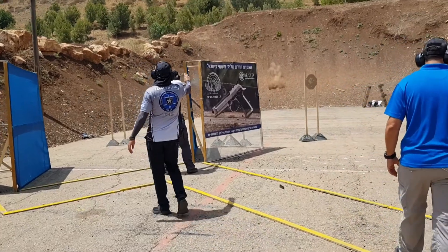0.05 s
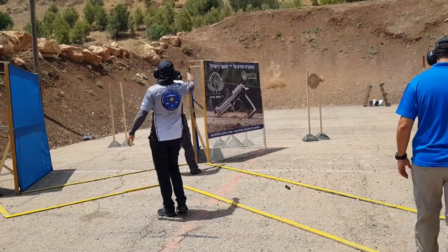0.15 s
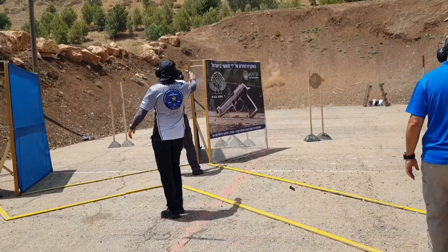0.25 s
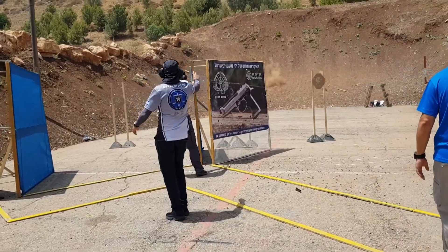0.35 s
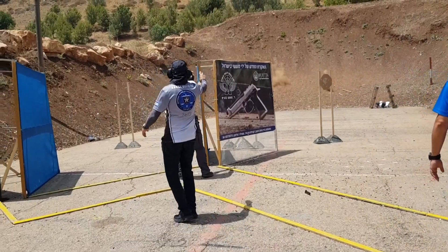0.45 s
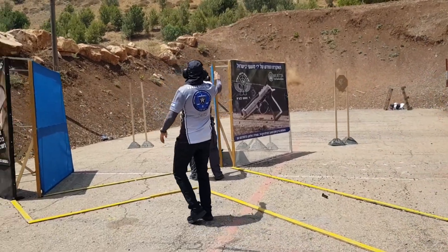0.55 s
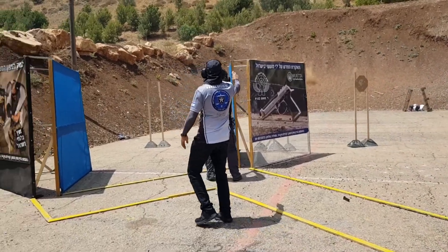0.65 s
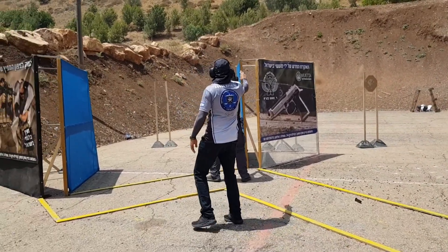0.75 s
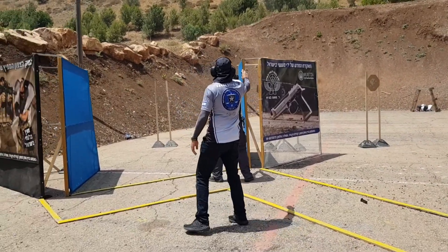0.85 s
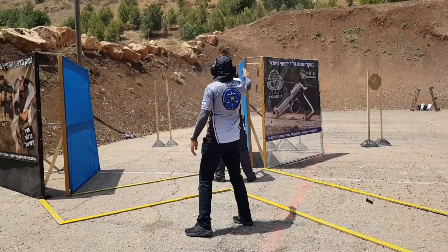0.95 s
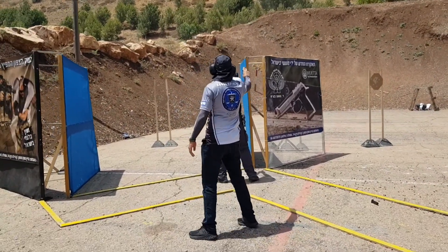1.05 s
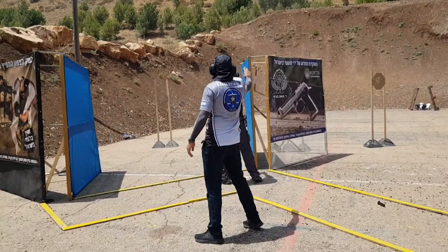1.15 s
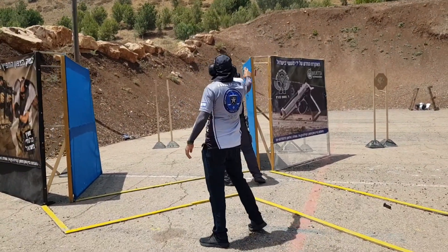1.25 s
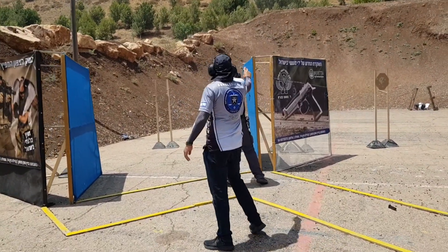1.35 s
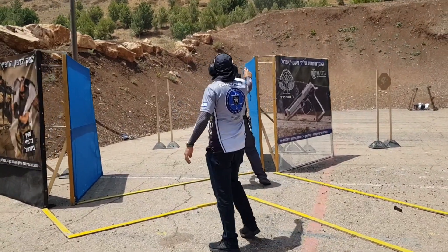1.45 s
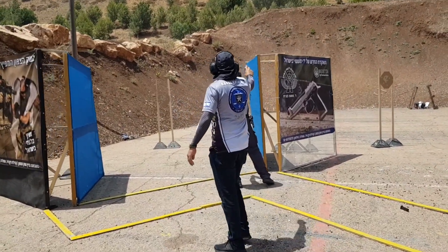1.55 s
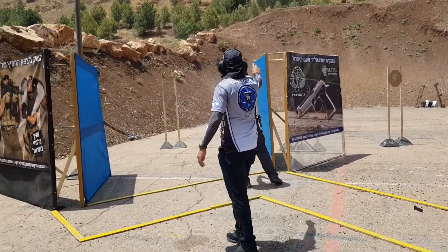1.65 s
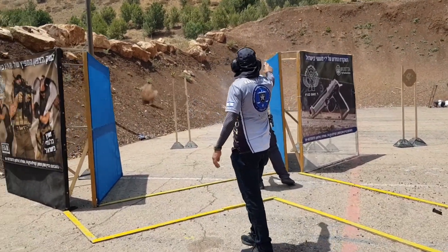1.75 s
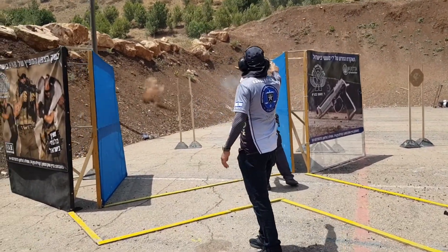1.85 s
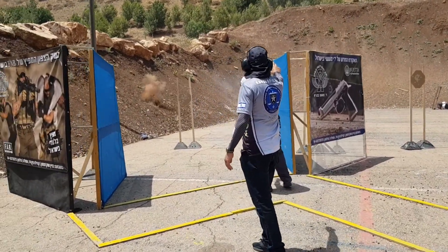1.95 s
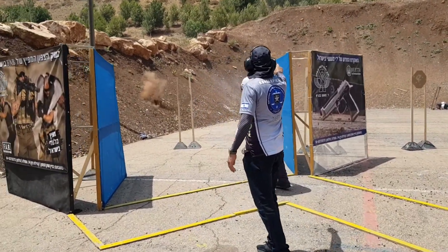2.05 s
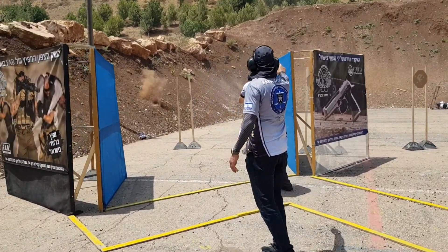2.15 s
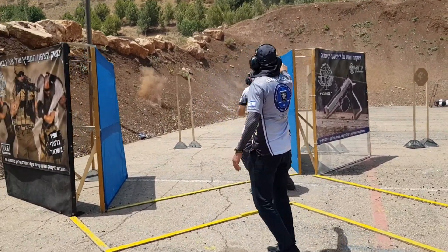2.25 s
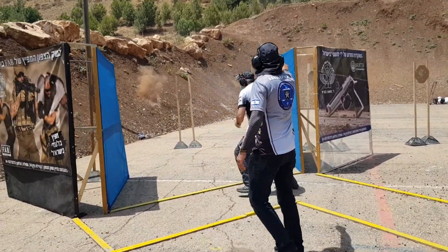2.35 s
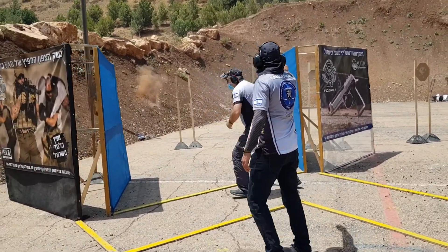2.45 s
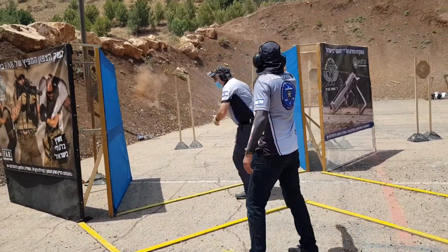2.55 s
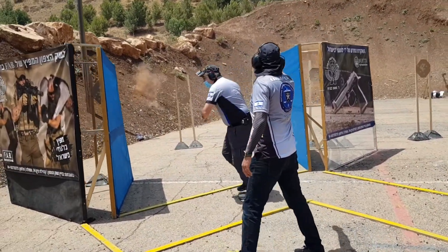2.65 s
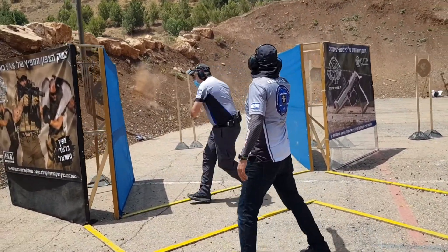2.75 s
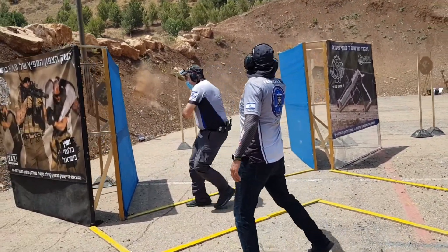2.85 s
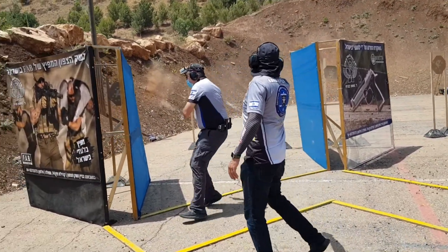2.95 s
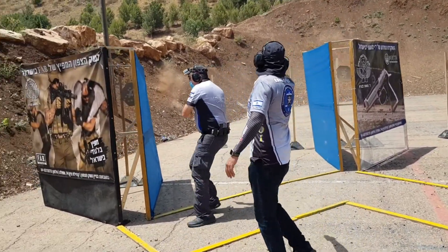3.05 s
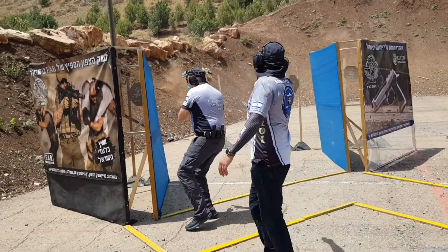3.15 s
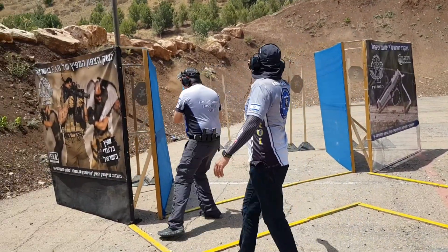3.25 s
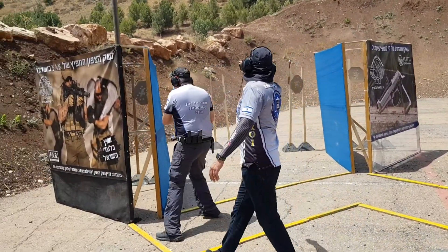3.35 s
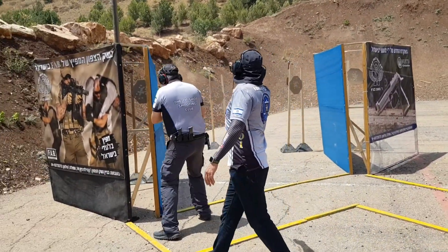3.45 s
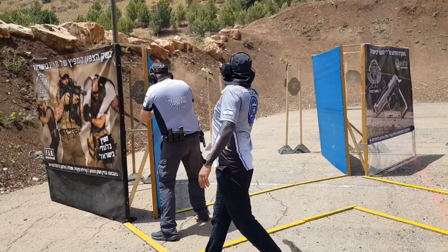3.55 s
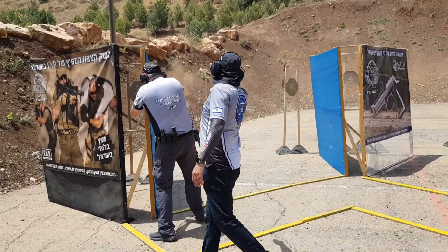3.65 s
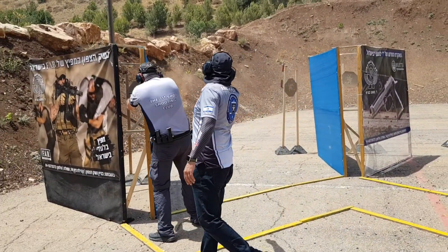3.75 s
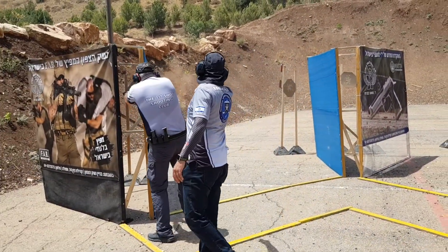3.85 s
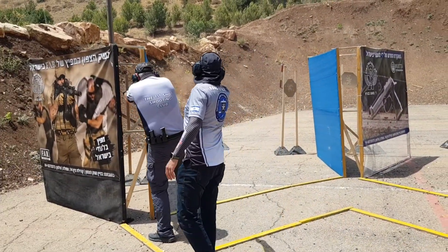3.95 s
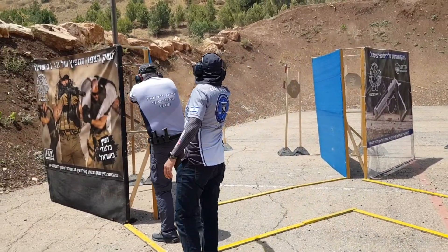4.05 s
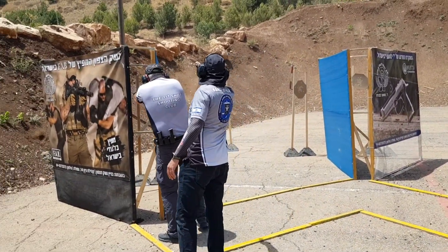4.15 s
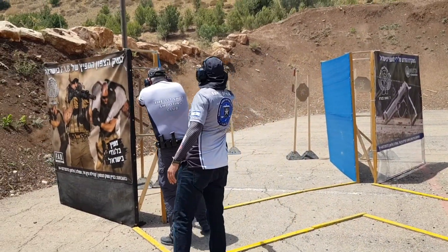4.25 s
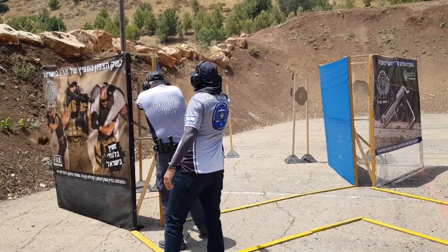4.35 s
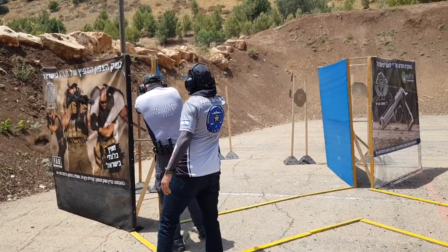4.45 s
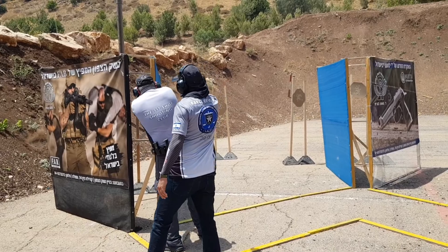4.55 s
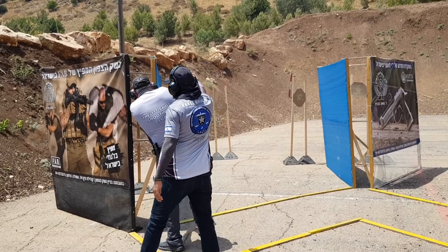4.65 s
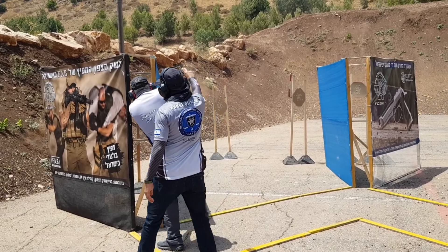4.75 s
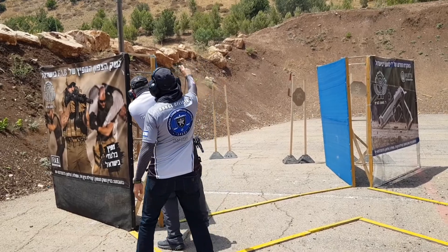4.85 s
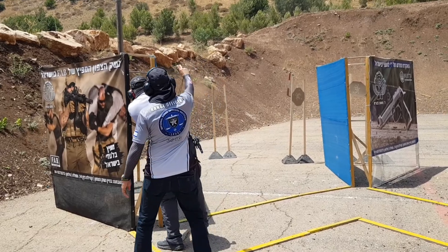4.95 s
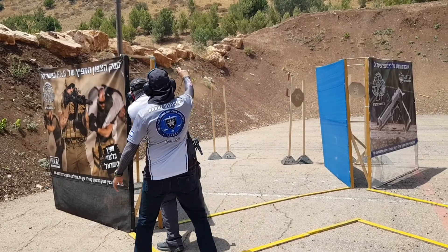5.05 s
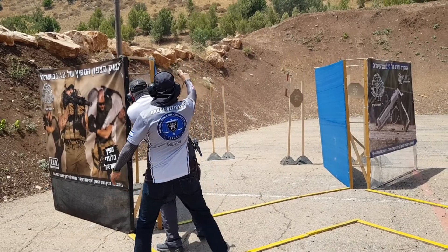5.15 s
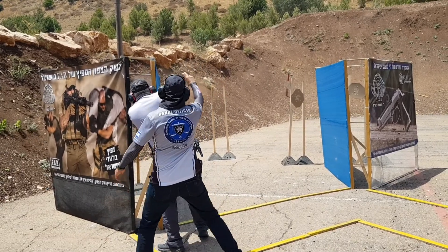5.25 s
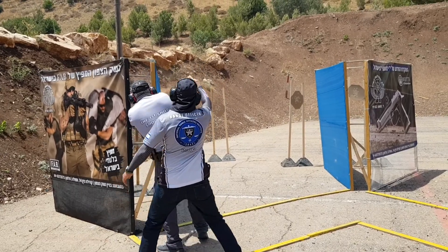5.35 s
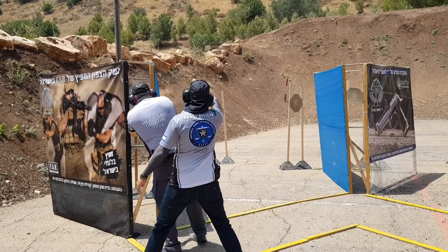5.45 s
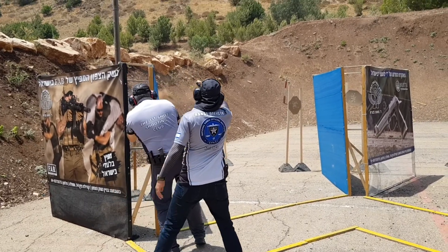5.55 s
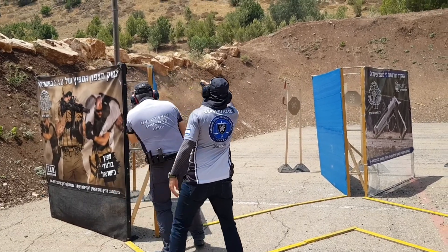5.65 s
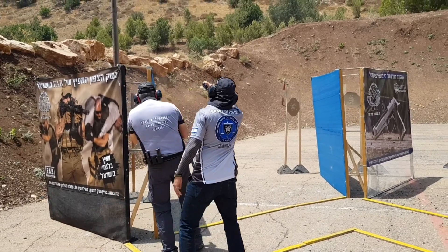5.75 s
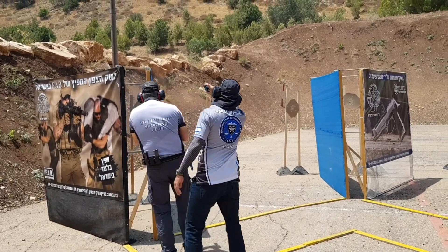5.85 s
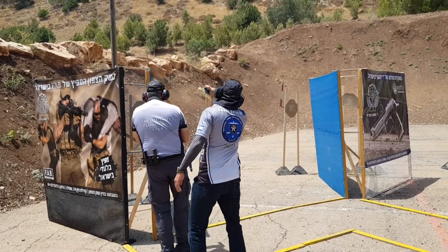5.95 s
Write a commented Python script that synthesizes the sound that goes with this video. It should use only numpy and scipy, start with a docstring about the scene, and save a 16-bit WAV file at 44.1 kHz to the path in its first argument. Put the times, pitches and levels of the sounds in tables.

```python
"""Pistol pairs on a walled range

A pistol fires quick pairs on a paved outdoor range walled by earth banks, a few metres from a phone.
Blasts are pressure pulses, direct and off panels; shaped noise is the wash; pulse clusters are bank slaps.
Brass cases tinkle as decaying sines and noise; shoes scuff, air hushes and a drone sinks as filtered noise.
The left port is muffled, the right one open; each channel is limited."""
import sys
import numpy as np
from scipy import signal
from scipy.fft import rfft, irfft
from scipy.io import wavfile
from scipy.ndimage import uniform_filter1d, minimum_filter1d

SR = 44100
rng = np.random.default_rng(int(sys.argv[2]) if len(sys.argv) > 2 else 0)


def wrap_up_sound(samples):
    """Save the sound to the file named by the first command line argument, as 16-bit audio."""
    columns = np.atleast_2d(samples).T
    # keep every value between -1 and 1, then stretch to whole-number steps
    tamed = np.clip(columns, -1, 1)
    steps = np.round(tamed * 32767).astype(np.int16)
    wavfile.write(sys.argv[1], SR, steps)


def invert_db(x):
    """Field ratio 10**(x/20) for x, a level in decibels (scalar or array-like)."""
    u = np.asarray(x, float) / 20
    return 10 ** u


N = 264600


def on_log(points, hz):
    """A (Hz, dB) table read on a log-frequency axis."""
    f, db = np.transpose(points)
    return np.interp(np.log(np.maximum(hz, 1)), np.log(f), db)


def colour(x, *tables, size=2048):
    """Causal filter, by folded cepstrum, whose gain is the sum of the (Hz, dB) tables."""
    hz = np.arange(size // 2 + 1) * SR / size
    gain = invert_db(sum(on_log(table, hz) for table in tables))
    cepstrum = irfft(np.log(gain))
    cepstrum[1:size // 2] *= 2
    cepstrum[size // 2 + 1:] = 0
    response = irfft(np.exp(rfft(cepstrum)))
    return signal.fftconvolve(x, response)[:len(x)]


def unit(x):
    """Scale to rms 1."""
    return x / np.sqrt(np.mean(x ** 2))


def band(x, hz, kind, order=2):
    """Butterworth filter."""
    return signal.sosfilt(signal.butter(order, hz, kind, fs=SR, output="sos"), x)


def walk(rate, size=N):
    """Random levels held 1 / rate s and slewed; spread near 1."""
    hold = int(SR / rate)
    levels = np.repeat(rng.standard_normal(size // hold + 1), hold)
    return uniform_filter1d(levels, hold)[:size]


def add(track, s, sound):
    """Mix a sound in at time s; what falls outside is lost."""
    i = int(round(s * SR))
    a, b = max(i, 0), max(min(i + sound.shape[-1], N), 0)
    if b > a:
        track[..., a:b] += sound[..., a - i:b - i]


def decay(t, t60):
    """Exponential fade, 60 dB in t60."""
    return np.exp(-np.log(1000) * t / t60)


# Shots. Each row: start in seconds, then relative levels in dB: blast, wash and slaps, wash bass, crack.
SHOT_ROWS = [(-.134, -13, 0, 4, -6), (0.1413, -6.5, 0, -2.5, -25), (0.337, -6.5, 1, -1, -22),
             (1.027, -7.5, -2.5, 6.5, -50), (1.246, -4.5, -3, 5, -19.5), (1.729, -5.5, -1.5, 6.5, -40),
             (1.9444, 1, -2.5, 5, -35.5), (4.1461, -16, -4.5, 4, -3), (4.3637, -6.5, -5, 3, -23.5),
             (4.8377, -8.5, -5, 3, -28.5), (5.0607, -8.5, -5, 3, -24)]
# Port responses. Each row: frequency in Hz, gain in dB.
OPEN_PORT = [(60, -28), (165, -27), (280, -12.5), (570, -2), (1000, -7), (2000, -8), (3200, -11),
             (4300, -8), (6900, -7), (8100, -24.5), (9500, -18.5), (12000, -12.5), (15000, -21)]
MUFFLED_PORT = [(60, -43.5), (300, -29.5), (1400, -31), (2500, -36.5), (4000, -53.5), (6800, -82.5),
                (15000, -75.5)]
MOVES_S = 3.0  # earlier shots are from the first stance, later ones from the second


def pistol():
    """All shots through the two port responses; cracks and thumps enter the open port directly."""
    air, close = np.zeros((2, N)), np.zeros(N)
    for s, blast_db, wash_db, bass_db, crack_db in SHOT_ROWS:
        stance = int(s > MOVES_S)
        add(air, s, wash(stance, wash_db, bass_db))
        add(close, s, invert_db(crack_db) * crack())
        add_blast(air, s, blast_db, stance)
        add_slaps(air, s, wash_db, stance)
    add_knocks(air)
    add_thumps(close)
    return np.array([colour(air[0], MUFFLED_PORT), colour(air[1], OPEN_PORT) + close])


# Scattering ground, one list per stance: near yard, foot and crest of the far bank, hills.
# Each row: start in ms after the shot, build in ms, relative peak in dB, fall in dB/s, treble in dB.
FIELD_ROWS = [
    [(0, 20.9, -1, 218, 1.5), (202.9, 4, -29, 112, 0.5), (215, 11, -30, 160, 1),
     (250, 37, -52.5, 28.5, -10)],
    [(0, 24.7, -1.5, 216, 1.5), (201, 8.5, -32, 99, 4), (227, 7.3, -32.5, 171, -1), (248, 50, -69, 11, -3)],
]
# How far under its peak a field starts, in dB, one entry per stance.
FIELD_BUILD_DB = [9, 10.5]
# The wash dips briefly before the side wall answers; one depth per stance.
LULL_DB, LULL_AT_MS, LULL_MS = [-3, -2], 70.8, 5
DULL_START_DB, DULL_START_MS = -3.5, 26.3


def fields(t, stance):
    """Level and treble of the wash: each field builds, then falls steadily in dB; their powers add."""
    start_ms, build_ms, db, fall, treble_db = np.transpose(FIELD_ROWS[stance])[:, :, None]
    ms = t * 1000 - start_ms
    db = db - FIELD_BUILD_DB[stance] * np.clip(1 - ms / build_ms, 0, 1)
    db = db - fall * np.maximum(ms - build_ms, 0) / 1000
    power = (ms >= 0) * invert_db(2 * db)
    total = power.sum(axis=0) + 1e-18
    lull_db = LULL_DB[stance] * np.exp(-((t * 1000 - LULL_AT_MS) / LULL_MS) ** 2)
    dull_db = DULL_START_DB * np.exp(-t * 1000 / DULL_START_MS)
    return 10 * np.log10(total) + lull_db, (power * treble_db).sum(axis=0) / total + dull_db


KNOCK_CYCLES, KNOCK_EDGE_DB = 1.2, -3  # cycles to fall to 1/e


def knock(hz):
    """A cycle or two of a dull tone with a rough bright edge."""
    t = np.arange(SR // 50) / SR
    edge = invert_db(KNOCK_EDGE_DB) * rng.standard_normal(len(t)) * decay(t, .005)
    return np.sin(2 * np.pi * hz * t) * np.exp(-t * hz / KNOCK_CYCLES) + edge


FACETS_PER_S, FACET_DB, FACETS_S = 110, 8, .08  # rate at each pitch


def facets(t):
    """Flat faces in the near yard knock at random times at each of three pitches, thinning in level."""
    out = 0
    for hz in np.geomspace(900, 2800, num=3):
        place, size = rng.random((2, len(t)))
        hits = (place < FACETS_PER_S / SR) * (2 * size - 1) * np.exp(-(t / FACETS_S) ** 2)
        out = out + invert_db(FACET_DB) * signal.fftconvolve(hits, knock(hz))[:len(t)]
    return out


AIM_DB = 2.8


def aim_bumps():
    """Random tone bumps, as every aim lights other surfaces."""
    hz = np.geomspace(700, 7000, num=20)
    db = AIM_DB * rng.standard_normal(len(hz)) * np.hanning(len(hz)) ** .25
    return np.transpose([hz, db])


# Time in ms for the open port's wash to swell to full gain: bass, middle, treble.
OPEN_SWELL_MS = [8.1, 11.9, 9.7]
LIKENESS_HZ, TILT_HZ = 744, 2600  # band edges; ports are alike below the first
GRAIN_DB, MIDDLE_DB = 3.2, 3


def wash(stance, wash_db, bass_db):
    """Thousands of small uneven echoes, alike at both ports in the bass, clumped differently by range."""
    t = np.arange(int(.8 * SR)) / SR
    level_db, treble_db = fields(t, stance)
    grain = np.minimum(rng.exponential(size=(3, len(t))), 5) - 1.5
    shared, left, right = rng.standard_normal((3, len(t))) * invert_db(GRAIN_DB * grain)
    faces = facets(t)
    shared, right = shared + faces, right + faces
    bass = band(shared, LIKENESS_HZ, "low")
    rest = band(np.array([left, right]), LIKENESS_HZ, "high")
    middle = band(rest, TILT_HZ, "low", order=3)
    treble = band(rest, TILT_HZ, "high", order=3)
    # each part: signal, level dB, clump spread dB
    parts = ((bass, bass_db, 2.6), (middle, MIDDLE_DB, 3), (treble, treble_db, 1.8))
    # the muffled port's wash is strongest at once and fades;
    # the open port's is held down at first and swells in over some ten ms
    muffled_gate = 0.7 + 3 * np.exp(-t / 0.021)
    pair = 0
    for swell_ms, (part, db, clump_db) in zip(OPEN_SWELL_MS, parts):
        gate = np.array([muffled_gate, np.clip(2 * t * 1000 / swell_ms - 1, .2, 1)])
        pair = pair + part * gate * invert_db(db + clump_db * walk(90, size=len(t)))
    flutter_db = 1.39 * walk(260, size=len(t))
    pair = pair * invert_db(wash_db + level_db + flutter_db) * (1 - (t / t[-1]) ** 4)
    # the bumps in tone shift as farther surfaces answer
    early, late = aim_bumps(), aim_bumps()
    near = np.exp(-(2 * t / FACETS_S) ** 2)
    return 2.68 * np.array([colour(port * near, early, size=512)
                            + colour(port * (1 - near), late, size=512) for port in pair])


CRACK_HZ, CRACK_MS, OPEN_LAG_MS = [3300, 5100], 4.4, 7.2


def crack():
    """A short hard noise crack, which returns off the panels with the wash and dies away."""
    ms = np.arange(8000) * 1000 / SR
    returned = (ms > OPEN_LAG_MS) * np.exp(-ms / 18.0)
    hiss = rng.standard_normal(len(ms)) * (np.exp(-(ms / CRACK_MS) ** 4) + returned)
    return 4 * band(hiss, CRACK_HZ, "band", order=4) + 2.5 * band(hiss, 11000, "high", order=6)


# Open-air hush. Each row: time in seconds, relative level in dB, tilt in dB per three octaves about 600 Hz.
AIR_ROWS = [(0.98, -57.5, 3.5), (2.5, -59.5, 6.5), (3.636, -65.5, 2.5), (4.098, -66, -1), (5.6, -61, 6.5)]
# Hush tone. Each row: frequency in Hz, gain in dB.
HUSH_TONE = [(150, -13), (212, -20.5), (300, -2.5), (600, 1), (1100, -3), (1380, -11), (1800, -6.5),
             (2300, -12.5), (3600, -16.5), (6700, -18.5), (8250, -46.5), (10600, -29.5), (15000, -39)]
# Extra tone of the left port. Each row: frequency in Hz, left minus right in dB.
HUSH_LEFT = [(150, -1.5), (300, -21), (1500, -28), (5000, -43.5), (8000, -31), (15000, -17.5)]
# Wind rumble. Each row: time in seconds, relative level in dB.
RUMBLE_ROWS = [(0, -80.5), (3.6, -85), (4.1, -82.5)]


def outdoors():
    """Patchy open-air hush, noise bands swelling apart, and a low wind rumble common to both ports."""
    s, db, tilt_db = np.transpose(AIR_ROWS)
    clock = np.arange(N) / SR
    hush = np.zeros((2, N))
    for hz in 150 * 2 ** np.arange(0, 6.6, .25):
        swell_db = (5.2 * walk(9.8) + 3.3 * walk(1.4)) * min(1, 1500 / hz)
        swell_db = swell_db + np.interp(clock, s, tilt_db) * np.log2(hz / 600) / 3
        noise = rng.standard_normal((2, N))
        hush += band(noise, [hz / 1.07, hz * 1.074], "band", order=1) * invert_db(swell_db)
    left = colour(hush[0], HUSH_TONE, HUSH_LEFT)
    right = colour(hush[1], HUSH_TONE)
    scale = 2 / np.std(band(right, [300, 1500], "band"))
    pair = scale * np.array([left, right]) * invert_db(np.interp(clock, s, db))
    rumble = unit(band(rng.standard_normal(N), [55, 110], "band", order=3))
    rumble = rumble * invert_db(np.interp(clock, *np.transpose(RUMBLE_ROWS)))
    return pair + rumble * invert_db(np.array([[-3], [2.5]]))


# Knocks off panels and far-bank faces. Each row: start in seconds, relative level in dB, pitch in Hz.
KNOCK_ROWS = [(0.0715, -11, 650), (0.1045, -10, 520), (0.5375, -10, 700), (0.5715, -12, 480),
              (1.2295, -12, 700), (1.4485, -13, 800), (1.9325, -9, 750), (2.1483, -11, 750),
              (2.1698, -10, 2200), (2.1773, -8, 2500), (1.9593, 9, 750), (1.9755, 8, 1100),
              (4.3737, 8, 1200)]


def add_knocks(air):
    """Single knocks off panels and faces of the far bank, at both ports."""
    for s, db, hz in KNOCK_ROWS:
        add(air, s, invert_db(db) * knock(hz))


def friedlander(ms):
    """Sudden overpressure lasting ms, then suction."""
    x = np.arange(300) * 1000 / SR / ms
    return (1 - x) * np.exp(-x)


# Direct sound, ground and panels, one list per stance. Each row: delay in ms after the shot, level in dB.
ARRIVAL_ROWS = [
    [(0, 3.5), (1.8, 9.5), (3.4, 5.5), (23, -5.5)],
    [(0, 5.5), (2.6, 5.5), (10, 3.5), (21, 0)],
]
BLAST_MS, MUFFLED_BLAST_DB, OPEN_BLAST_DB = 0.49, 28, -10  # gains ahead of the port responses


def add_blast(air, s, db, stance):
    """Sharp arrivals of the muzzle pulse, low-passed at the open port."""
    pulse = friedlander(BLAST_MS)
    soft_pulse = band(pulse, 1300, "low")
    for ms, echo_db in ARRIVAL_ROWS[stance]:
        add(air[0], s + ms / 1000, invert_db(db + echo_db + MUFFLED_BLAST_DB) * pulse)
        add(air[1], s + ms / 1000, invert_db(db + echo_db + OPEN_BLAST_DB) * soft_pulse)


# Buffets of the open port. Each row: start in seconds, relative level in dB.
THUMP_ROWS = [(0.161, -23.5), (0.348, -23), (1.033, -24.5), (1.98, -17), (4.147, -6.5), (4.3717, -13),
              (5.068, -21)]
THUMP_HZ, THUMP_FADE_S = 58.7, 0.035 / 9  # the swell peaks after two of these


def add_thumps(close):
    """Low tone swells in the open port as blasts buffet it."""
    t = np.arange(8000) / SR
    swing = t / THUMP_FADE_S
    thump = swing ** 2 * np.exp(-swing) * 2 * np.sin(2 * np.pi * THUMP_HZ * t)
    for s, db in THUMP_ROWS:
        add(close, s, invert_db(db) * thump)


# Slaps from wall and banks, one list per stance. Each row: delay in ms after the shot, relative level in dB.
SLAP_ROWS = [
    [(102.5, -1)],
    [(92, 0.5), (202.6, 0)],
]
# Overpressure time of a slap pulse in ms, one entry per stance.
SLAP_PULSE_MS = [0.36, 0.034]


def add_slaps(air, s, db, stance):
    """A rough surface returns a fading cluster of nine pulses of random size and sign."""
    pulse = friedlander(SLAP_PULSE_MS[stance])
    for ms, echo_db in SLAP_ROWS[stance]:
        for late, size in rng.random((9, 2)):
            gain = invert_db(db + echo_db) * (4 * size - 2) * (1 - late)
            add(air, s + (ms + 2.1 * late) / 1000, gain * pulse)


# Bouncing brass. Each row: start in seconds, relative tick level in dB, ring in Hz, relative ring level in dB.
CASE_ROWS = [(0.943, -43, 10200, -46.5), (1.557, -62, 10150, -55), (2.467, -45, 10300, -52.5),
             (2.6, -42, 10400, -50.5), (2.834, -42.5, 10300, -42.5), (2.877, -41, 10440, -66),
             (3.138, -39.5, 10300, -57.5), (3.316, -42, 11100, -59.5), (3.385, -40, 10470, -59.5),
             (3.5155, -45, 11000, -57), (3.5473, -63, 11150, -49.5), (3.5574, -53, 5180, -59.5),
             (3.6514, -47, 10480, -46), (3.7848, -39.5, 10220, -65.5), (3.8487, -39, 10380, -67),
             (4.0019, -50, 10450, -54), (5.457, -40.5, 9900, -55), (5.6024, -50.5, 10000, -62),
             (5.803, -68, 10450, -62), (5.898, -62, 10240, -62), (5.98, -37, 10400, -48.5)]
TICK_HZ, TICK_T60_S = 5310, 0.01  # each tick is detuned up to 2.5 %
STRIKE_T60_S, SUSTAIN_DB = 0.018, -17.5
RING_T60_S = 1.1  # before the half-second linear fade
SPIN_HZ = 44.5  # scaled at random by 0.5 to 1.5


def cases():
    """Each bounce ticks and rebounds faintly; the brass tube rings on and wavers as it spins."""
    out, t = np.zeros(N), np.arange(SR // 2) / SR
    touch = 1 - np.exp(-t / 0.00014)
    for (s, db, hz, ring_db), (a, b) in zip(CASE_ROWS, rng.random((len(CASE_ROWS), 2))):
        tone = np.sin(2 * np.pi * TICK_HZ * (1 + (a - .5) / 20) * t)
        rattle = band(rng.standard_normal(len(t)), [4300, 6800], "band", order=4)
        tick = invert_db(db) * decay(t, TICK_T60_S) * (np.sqrt(b) * tone + rattle)
        click = band(rng.standard_normal(len(t)), [9800, 14000], "band", order=4)
        click = .25 * decay(t, .018) * click
        spin = invert_db(6.5 * walk(SPIN_HZ * (.5 + b), size=len(t))) * (1 - 2 * t)
        fade = decay(t, STRIKE_T60_S) + invert_db(SUSTAIN_DB) * decay(t, RING_T60_S) * spin
        ring_hz = hz + 40 * walk(150, size=len(t))
        ring = fade * np.sin(2 * np.pi * np.cumsum(ring_hz) / SR)
        add(out, s, 2 * touch * (tick + invert_db(ring_db) * (click + ring)))
        add(out, s + (1 + b / 4) / 110, invert_db(-14) * 2 * touch * tick)  # rebound
    return np.array([[invert_db(-37.5)], [1]]) * out


# Standing-out band of the hush. Each row: time in seconds, centre in Hz, relative level in dB.
DRONE_ROWS = [(2.6, 758.4, -71), (3.03, 680, -64), (3.36, 590, -69.5), (3.5, 570, -82.5), (3.61, 550, -61),
              (3.72, 540, -73)]
DRONE_WIDTH_HZ = 54  # low-pass edge either side of the centre


def drone():
    """A narrow band of noise around a sinking centre, at the open port."""
    s, hz, db = np.transpose(DRONE_ROWS)
    clock = np.arange(N) / SR
    turn = 2 * np.pi * np.cumsum(np.interp(clock, s, hz)) / SR
    a, b = band(rng.standard_normal((2, N)), DRONE_WIDTH_HZ, "low")
    tone = unit(a * np.cos(turn) + b * np.sin(turn))
    return np.array([[0], [2]]) * tone * invert_db(np.interp(clock, s, db, left=-np.inf))


# Scuffs. Each row: centre in seconds, relative level in dB, time from centre to 1/e in seconds.
STEP_ROWS = [(3.179, -64.5, 0.058), (3.367, -64, 0.054), (3.835, -59.5, 0.033)]


def steps():
    """Soft swells of grit under rubber soles, dull noise with a thinner upper band."""
    out, t = np.zeros(N), np.arange(SR // 4) / SR
    middle = t[-1] / 2
    for s, db, length in STEP_ROWS:
        noise = rng.standard_normal(len(t))
        grit = unit(band(noise, [480, 760], "band")) + 0.6 * unit(band(noise, [1500, 2600], "band"))
        add(out, s - middle, invert_db(db) * 2 * grit * np.exp(-((t - middle) / length) ** 2))
    return np.array([[invert_db(-30.0)], [1]]) * out


def scene():
    """Shots, open air, cases, drone and steps."""
    return pistol() + outdoors() + cases() + drone() + steps()


def band_limit(x):
    """A steep low-pass at the top of the band."""
    return signal.sosfilt(signal.butter(12, 16620, fs=SR, output="sos"), x)


TOP_HZ, CEILING, LOOKAHEAD_MS, RELEASE_MS = 15600, 0.95, 2.75, 1.3


def record(dry):
    """The top is cut; a look-ahead limiter on each channel holds peaks under the ceiling."""
    dry = signal.sosfilt(signal.ellip(8, .2, 70, TOP_HZ, fs=SR, output="sos"), dry)
    ahead = int(LOOKAHEAD_MS * SR / 1000)
    back = np.exp(-1000 / (RELEASE_MS * SR))
    need = np.minimum(1, CEILING / (np.abs(dry) + 1e-9))
    need = minimum_filter1d(need, 2 * ahead + 1, axis=1)
    slow = 1 - signal.lfilter([1 - back], [1, -back], 1 - need, axis=1)
    gain = uniform_filter1d(np.minimum(need, slow), ahead, axis=1)
    return band_limit(np.clip(dry * gain, -1, 1))


dry = scene()
out = record(dry)
wrap_up_sound(out)
```